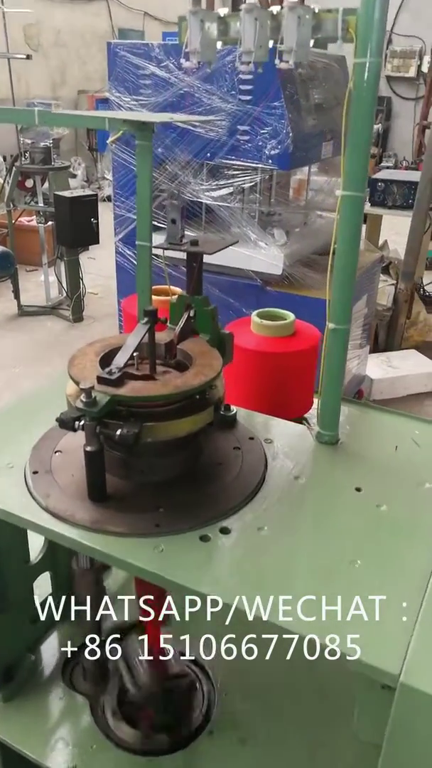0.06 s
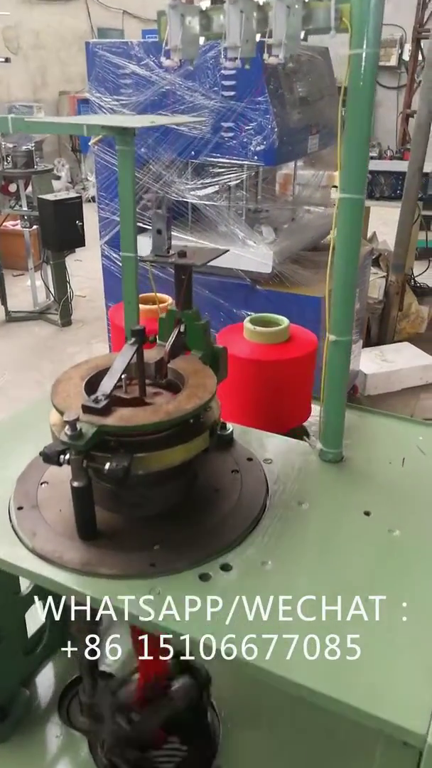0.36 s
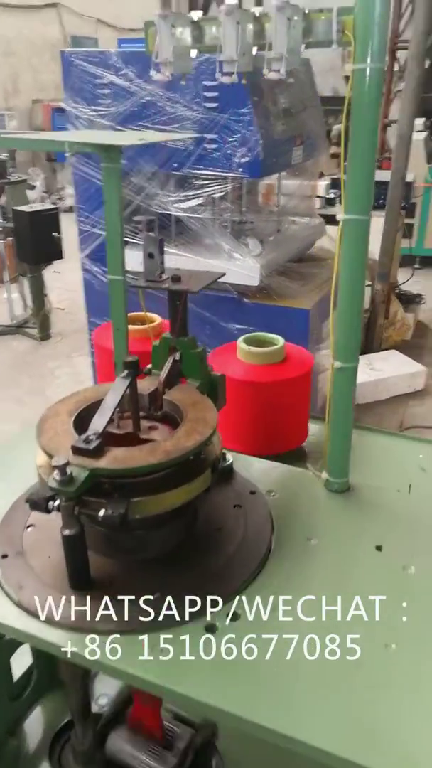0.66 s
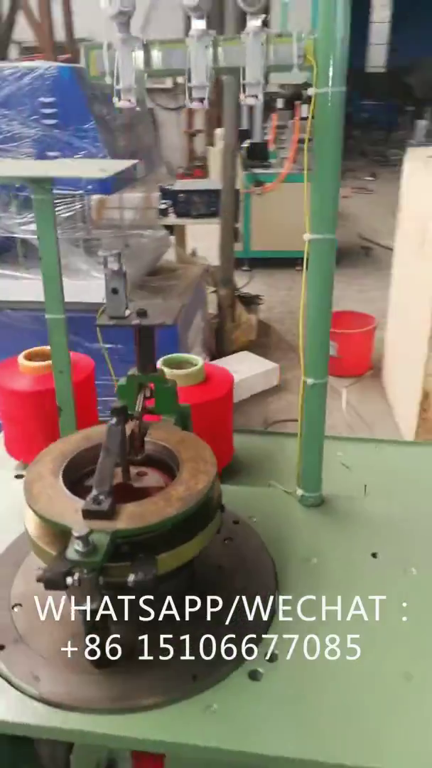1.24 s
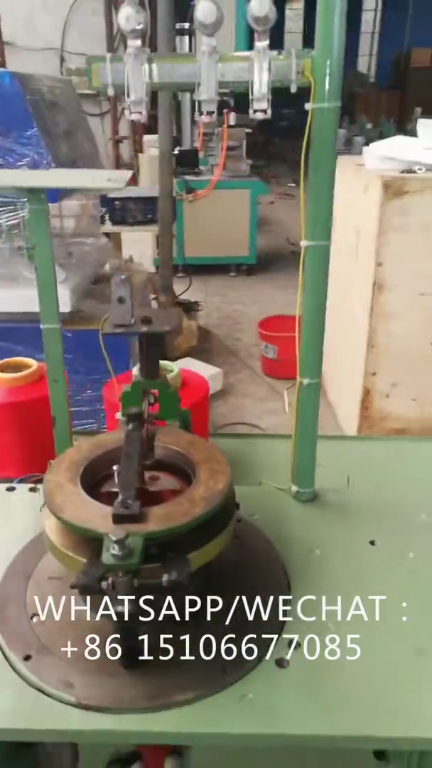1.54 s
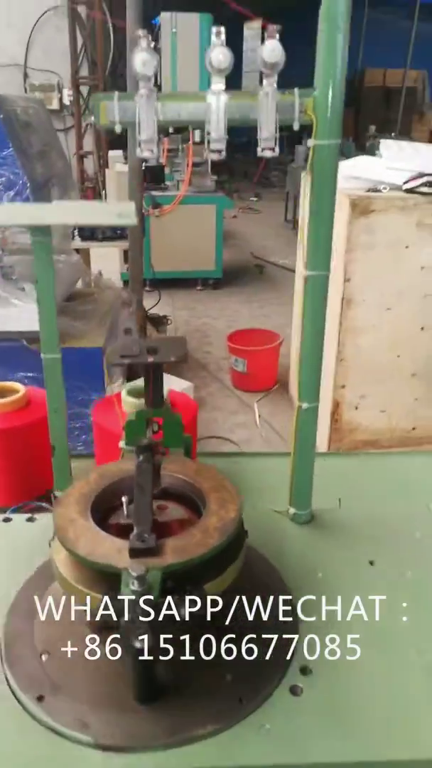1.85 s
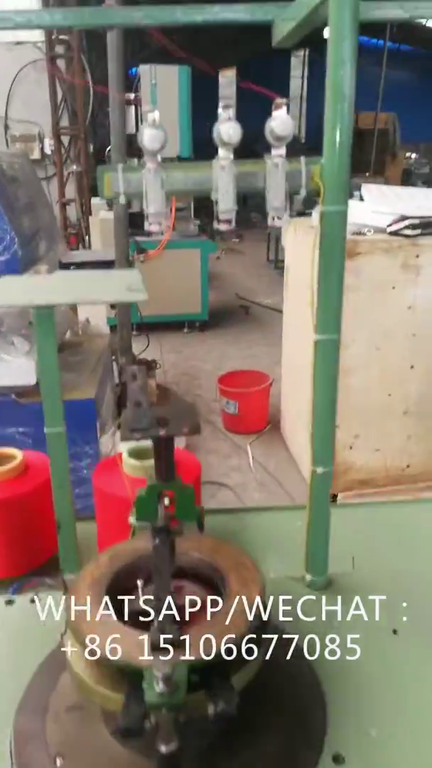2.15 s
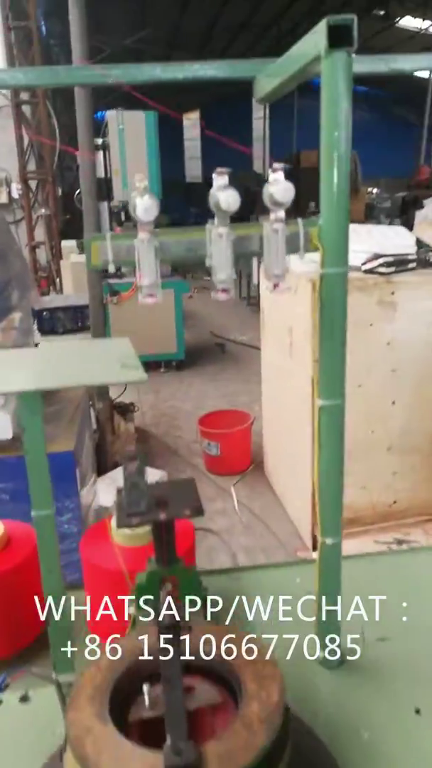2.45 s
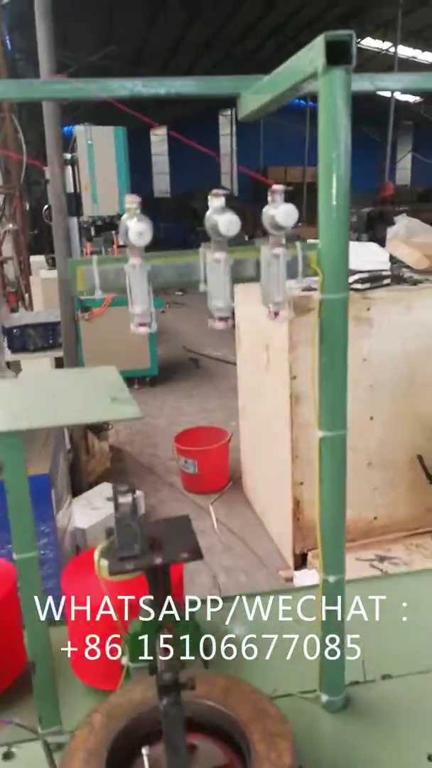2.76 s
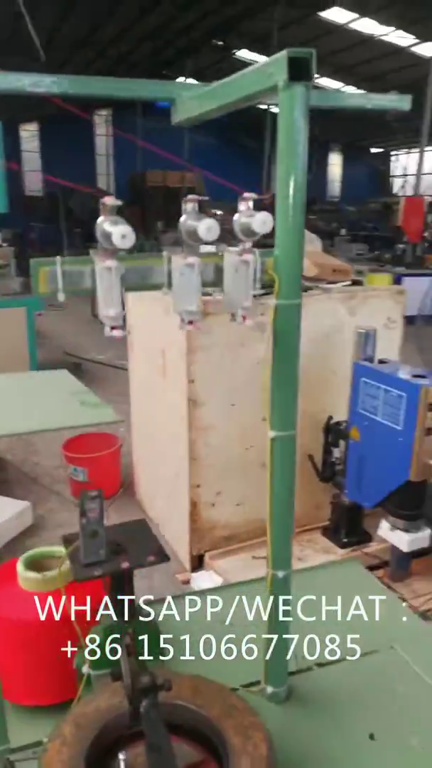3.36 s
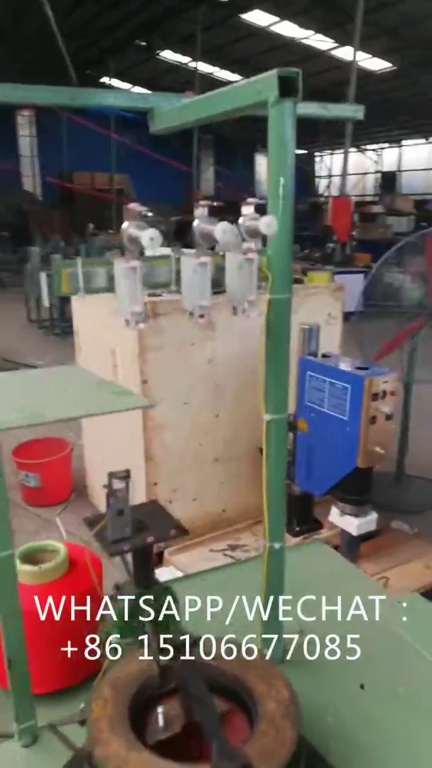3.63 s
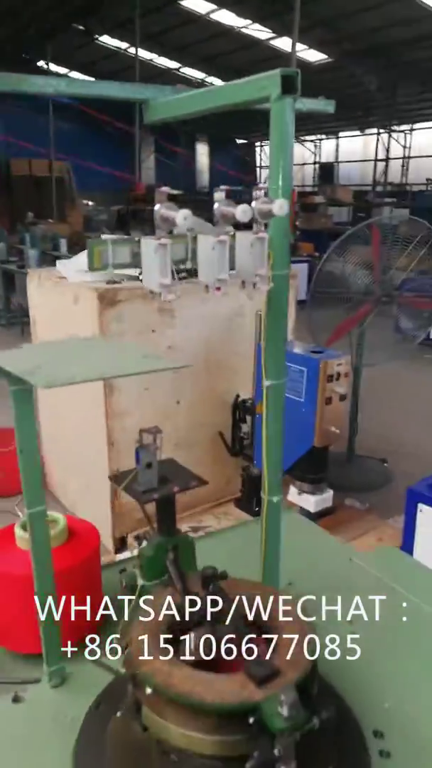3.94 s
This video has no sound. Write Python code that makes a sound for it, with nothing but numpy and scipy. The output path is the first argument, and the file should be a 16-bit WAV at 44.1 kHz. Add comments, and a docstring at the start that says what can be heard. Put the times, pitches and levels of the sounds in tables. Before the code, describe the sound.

A circular knitting machine whirs and hums steadily in a workshop. Each quick turn brings two metallic clacks, soft thumps and a few faint ticks. The whir grates briefly early on, then grows a little brighter as the nearby microphone moves.

```python
"""A small circular knitting machine runs in a factory hall at about 2.6 turns a second. Needles swish
and rattle through the cams over the hum of the drive. Each turn opens with a brief lull and a pair of
ringing steel clacks; then the frame thumps, the cam box swells and, about half a turn on, come a few
lighter ticks. Early on the whir grates three times, and a brief knock near 2.1 kHz thickens the clack
at 0.83 s. The microphone drifts past: the whir is brightest around 3 s, then shifts back."""
import sys
import numpy as np
from scipy import signal
from scipy.fft import rfft, irfft
from scipy.io import wavfile
from scipy.ndimage import uniform_filter1d

SR = 44100
rng = np.random.default_rng(int(sys.argv[2]) if len(sys.argv) > 2 else 0)


def materialize(psi):
    """Save the field psi as 16-bit PCM at rate SR to the path in sys.argv[1].

    A 1-D psi becomes a single channel; in a 2-D psi each row is a channel.
    """
    bounded = np.clip(np.atleast_2d(psi).T, -1, 1)
    quanta = np.round(bounded * 32767).astype(np.int16)
    wavfile.write(sys.argv[1], SR, quanta)


N = 176400
TIME_S = np.arange(N) / SR


def amp(db):
    """Decibels to gain."""
    return 10 ** (np.asarray(db) / 20)


def unit(x):
    """Scales to rms 1."""
    return x / np.sqrt(np.mean(x ** 2) + 1e-20)


def bell(offset, sigma):
    """Gaussian of height 1."""
    return np.exp(-(offset / sigma) ** 2 / 2)


def read(table, hz, column=1):
    """Interpolates a column along log frequency."""
    columns = np.transpose(table)
    return np.interp(np.log(hz + 1), np.log(columns[0] + 1), columns[column])


def add(mix, start_s, sound):
    """Mixes a stereo sound in at start_s."""
    part = mix[:, max(round(start_s * SR), 0):][:, :sound.shape[1]]
    part += sound[:, :part.shape[1]]


def colour(x, spectrum, size=2048):
    """Minimum-phase filter of unit energy."""
    log_gain = np.log(amp(read(spectrum, abs(np.fft.fftfreq(size, 1 / SR)))))
    response = np.exp(np.conj(signal.hilbert(log_gain)))
    taps = np.fft.ifft(response).real[:size // 2]
    return signal.oaconvolve(x, taps[None] / np.linalg.norm(taps), axes=1)[:, :N]


def pair(a, b, correlation):
    """Correlated stereo from two independent signals."""
    correlation = np.clip(correlation, -1, 1)
    mid, side = np.sqrt((1 + correlation) / 2) * a, np.sqrt((1 - correlation) / 2) * b
    return np.array([mid + side, mid - side])


# Stereo field. Each row: frequency in Hz, left-right correlation, left over right in dB.
STEREO = [(60, 1, -7), (172, 1, 3), (330, 0.48, -4.5), (650, -0.93, -1), (750, 0.17, -0.9),
          (1440, 0.41, -2), (2020, 0.12, -1), (2990, -0.37, -3.5), (3550, 0.24, 0), (4800, -0.16, 2),
          (10300, -0.019, -0.5), (15000, 0.059, 3.5)]


def resonance(centre_hz, width_hz):
    """Stereo noise held in one resonance."""
    hz = np.fft.rfftfreq(N, 1 / SR)
    detuning = 2 * (hz - centre_hz) / width_hz
    a, b = irfft(rfft(rng.standard_normal((2, N))) / (1 + detuning ** 2) ** 2, N)
    return pair(unit(a), unit(b), read(STEREO, centre_hz))


def tone(hz, offset_rad):
    """Sine of rms 1, reaching the left channel a little late."""
    phase = 2 * np.pi * hz * TIME_S + offset_rad
    lag_rad = np.arccos(np.clip(read(STEREO, hz), -1, 1))
    return np.sqrt(2) * np.sin([phase - lag_rad, phase])


# Microphone drift. Each row: time in seconds, share of the move made, whir level in dB,
# left over right above the bass in dB.
MIC_PATH = [(0, 0.31, -29, 4.5), (.7, 0.43, -29, 4), (1.3, 0.26, -28.5, 5), (2, 0.42, -28, 3.5),
            (2.7, 0.98, -28, 1), (3.4, 0.96, -28, 1.3), (4, 0.3, -28, 0.5)]
# Whir of cylinder and drive. Each row: frequency in Hz, relative density in dB.
WHIR_SPECTRUM = [(50, -46), (100, -17), (215, -17.5), (300, -6), (430, -11), (660, -7.5), (880, -9.5),
                 (1500, -5), (2200, -7.5), (2800, -14), (3600, -12.5), (5200, -17), (8000, -20),
                 (10000, -24), (10700, -28.5), (13000, -27), (14300, -24.5), (15800, -32)]
# Colour change over the full move. Each row: frequency in Hz, gain in dB.
MOVE_COLOUR = [(50, 4), (130, -0.5), (300, 0), (600, 0), (1100, -1.5), (2000, -0.5), (3800, 3), (7000, 2),
               (14000, 5)]
# Steely peaks that slide with the move. Each row: from and to in Hz, sigma in Hz, boost in dB.
WHIR_PEAKS = [(1150, 1120, 150, 5.5), (1920, 1640, 78, 5), (4820, 4380, 140, 4.5)]


def whir(patch_db=1.56, flutter_db=0.57, ripple_db=2.5, bass_edge_hz=780, size=1024):
    """Needles and yarn slide round the cylinder: a fluttering rush with many fine resonances."""
    hop = size // 4
    frames, hz = N // hop + 5, np.fft.rfftfreq(size, 1 / SR)
    t = np.arange(frames) * hop / SR
    a, b, c, d, patches, ripple = rng.standard_normal((6, frames, len(hz)))
    patches = uniform_filter1d(patches, size=7, axis=0)
    patches = unit(uniform_filter1d(patches, size=9, axis=1))
    ripple = unit(uniform_filter1d(ripple, size=150, axis=0))
    flutter = unit(uniform_filter1d(rng.standard_normal((frames, 1)), size=3, axis=0))
    path_s, *controls = np.transpose(MIC_PATH)
    moved, level_db, pan_db = (np.interp(t, path_s, v)[:, None] for v in controls)
    field_db = read(WHIR_SPECTRUM, hz) + moved * read(MOVE_COLOUR, hz)
    field_db += patch_db * patches + ripple_db * ripple + flutter_db * flutter
    for from_hz, to_hz, sigma_hz, db in WHIR_PEAKS:
        field_db += db * bell(hz - from_hz - moved * (to_hz - from_hz), sigma_hz)
    pan_db = pan_db * np.minimum(hz / bass_edge_hz, 1) + read(STEREO, hz, column=2)
    noise = pair(a + 1j * b, c + 1j * d, read(STEREO, hz))
    spectra = noise * amp([field_db + pan_db / 2, field_db - pan_db / 2])
    rush = signal.istft(spectra.swapaxes(1, 2), nperseg=size, noverlap=size - hop)[1][:, :N]
    return unit(rush) * amp(np.interp(TIME_S, t, level_db[:, 0]))


# Needle rattle in the cam box. Each row: frequency in Hz, relative density in dB.
RATTLE_SPECTRUM = [(300, -25.5), (800, -5.5), (1130, 0.5), (1480, -1), (1760, 0.5), (2600, -10),
                   (4400, -11.5), (15000, -31)]


def rattle(level_db=-35.5, taps_per_s=500, spread_db=3.5, correlation=0.35):
    """Needle butts tap the cams at random, a few of them harder."""
    struck = rng.random(N) < taps_per_s / SR
    force = amp(spread_db * np.minimum(rng.exponential(1, N), 3.5))
    taps = struck * force * rng.choice([-1., 1.], (2, N))
    return amp(level_db) * unit(colour(pair(*taps, correlation), RATTLE_SPECTRUM))


# Drive hum and thin whines. Each row: frequency in Hz, level in dB, linewidth in Hz,
# drift in dB per second as the microphone moves.
DRIVE_TONES = [(60, -65, 1, 1.2), (141, -57.5, 8, 1), (252, -49.5, 5, 1), (306, -53.5, 7, 0),
               (397, -54.5, 4, 1), (462, -52.5, 4, 0), (564, -48.5, 4, -2), (1152, -47.5, 9, 2),
               (1270, -42.5, 5, -1.8), (1701, -47, 10, 1.8), (1781, -48.5, 10, -3), (1910, -50, 8, -2.5),
               (4376, -53.5, 2, .5), (5152, -58.5, 1, 0), (5270, -57.5, 1, 0), (9958, -65.5, 4, 0)]


def hum(waver_db=3, points=800):
    """Tones of motor, belt and gears wander in phase and waver in level."""
    t, total = np.linspace(0, N / SR, points), np.zeros((2, N))
    for hz, db, width_hz, db_per_s in DRIVE_TONES:
        wander_rad = np.cumsum(rng.standard_normal(points)) * np.sqrt(2 * np.pi * abs(width_hz) * t[1])
        waver = unit(uniform_filter1d(rng.standard_normal(points), size=14))
        gain = amp(db + db_per_s * (t - t.mean()) + waver_db * waver)
        total += np.interp(TIME_S, t, gain) * tone(hz, np.interp(TIME_S, t, wander_rad))
    return total


def lull(depth_db=-1.5, half_s=0.017):
    """Gain that eases off just before each pair of clacks."""
    dips = sum(np.exp(-((TIME_S - start_s + half_s) / half_s) ** 2) for start_s in turn_starts_s())
    return amp(depth_db * dips)


def scrape(fall_s, hold_s=0.0032, rise_s=0.0019):
    """A few milliseconds of steel chattering on steel."""
    t = np.arange(SR // 10) / SR
    envelope = np.minimum(t / rise_s, 1) * np.exp(-np.maximum(t - hold_s, 0) / fall_s)
    return rng.standard_normal((2, len(t))) * envelope


# Steel clacks, two a turn. Each row: start in seconds, strike and ring in relative dB.
CLACKS = [(0.0192, -16.5, -29.5), (0.0583, -17.5, -29), (0.4019, -14.5, -29), (0.4426, -22, -29.5),
          (0.7853, -21, -34), (0.8297, -21.5, -30), (1.172, -20.5, -29), (1.215, -25, -30),
          (1.5534, -21, -32.5), (1.599, -25, -31), (1.9373, -17.5, -29), (1.982, -26, -29.5),
          (2.319, -19.5, -33.5), (2.363, -24, -30.5), (2.6975, -20, -34), (2.7414, -24.5, -33),
          (3.0803, -21, -46), (3.118, -21, -31), (3.4576, -25, -40), (3.4998, -19, -28.5),
          (3.8393, -20, -37), (3.877, -22.5, -35)]
# Colour of a clack. Each row: frequency in Hz, relative density in dB.
CLACK_SPECTRUM = [(200, -39), (1200, -7), (2200, 8), (4000, 3.5), (6000, 7), (7800, 1), (10500, -4.5),
                  (15000, -6.5)]


def clacks(gain_db=-6):
    """Steel strikes steel twice as each turn opens."""
    strikes = np.zeros((2, N))
    for start_s, db, _ in CLACKS:
        add(strikes, start_s, amp(db + gain_db) * scrape(fall_s=0.0051))
    return colour(strikes, CLACK_SPECTRUM)


# Ringing steel parts. Each row: centre in Hz, width in Hz, relative level in dB, T60 in seconds,
# drift in dB per second as the microphone moves.
STEEL_BANDS = [(2500, 900, 1.5, 0.072, 5.5), (3302, 830, 4.5, 0.13, -1.3), (7780, 310, -4.5, 0.045, -5.5)]


def ring(gain_db=-3.5, rise_s=0.0068):
    """Each clack sets clusters of close steel modes ringing."""
    t, blows, total = np.arange(SR // 4) / SR, np.zeros(N), np.zeros((2, N))
    for start_s, _, ring_db in CLACKS:
        blows[round(start_s * SR)] = amp(ring_db + gain_db)
    for hz, width_hz, db, t60_s, db_per_s in STEEL_BANDS:
        envelope = np.minimum(t / rise_s, 1) * amp(db - 60 * t / t60_s)
        drift = amp(db_per_s * (TIME_S - N / SR / 2))
        total += resonance(hz, width_hz) * drift * signal.oaconvolve(blows, envelope)[:N]
    return total


def hall(x, gain_db=-5.5, t60_s=0.24, gap_s=0.003):
    """Diffuse reflections from the table and the hall around it."""
    t = np.arange(SR // 2) / SR
    tail = rng.standard_normal((2, len(t))) * amp(-60 * t / t60_s) * (t > gap_s)
    return amp(gain_db) * signal.fftconvolve(x, tail / np.linalg.norm(tail[0]), axes=1)[:, :N]


def turn_starts_s():
    """Time of the first clack of each pair."""
    return np.array(CLACKS)[::2, 0]


def turn_pulse(delay_s, sigma_s):
    """Smooth pulse delay_s into every turn."""
    starts_s = turn_starts_s()
    turn = np.maximum(np.searchsorted(starts_s, TIME_S) - 1, 0)
    return bell(TIME_S - starts_s[turn] - delay_s, sigma_s)


# Frame thumps. Each row: delay into the turn in seconds, level in dB.
FRAME_THUMPS = [(0.12, -44), (0.335, -38.5)]


def thumps(hz=314.4, sigma_s=0.014):
    """The frame thumps softly as the load rises, twice a turn."""
    load = sum(amp(db) * turn_pulse(delay_s, sigma_s) for delay_s, db in FRAME_THUMPS)
    return load * tone(hz, 2 * np.pi * rng.random())


# Cam box swells. Each row: delay into the turn in seconds, centre in Hz, width in Hz, level in dB.
CAM_SURGES = [(0.216, 1054, 170, -33), (0.318, 1090, 300, -33.5), (0.187, 4490, 760, -39)]


def surges(sigma_s=0.012):
    """The cam box swells as the load rises at set angles of each turn."""
    return sum(amp(db) * resonance(hz, width_hz) * turn_pulse(delay_s, sigma_s)
               for delay_s, hz, width_hz, db in CAM_SURGES)


# Light ticks. Each row: start in seconds, relative level in dB.
TICKS = [(0.2396, -26), (0.2815, -27), (0.6209, -23), (0.6626, -23), (0.7053, -27.5), (0.999, -24.5),
         (1.042, -27), (1.38, -27), (1.4206, -26), (1.4964, -30), (1.762, -30), (1.8006, -26.5),
         (2.1411, -26), (2.184, -24.5), (2.233, -29), (2.5266, -29.5), (2.5675, -27), (2.6148, -32),
         (2.9096, -25), (2.9522, -26.5), (3.3377, -27), (3.7614, -32)]
# Colour of a tick. Each row: frequency in Hz, relative density in dB.
TICK_SPECTRUM = [(200, -38), (1200, -1), (4400, -2), (6600, 4.5), (7600, 7.5), (8500, 3), (10500, -3),
                 (15000, -7)]


def ticks(gain_db=-1.5):
    """Shorter steel contacts, about half a turn after the clacks."""
    strikes = np.zeros((2, N))
    for start_s, db in TICKS:
        add(strikes, start_s, amp(db + gain_db) * scrape(fall_s=0.0031))
    return colour(strikes, TICK_SPECTRUM)


# Three grates, then a knock. Each row: peak time in seconds, centre in Hz, width in Hz, level in dB.
GRATES_AND_KNOCK = [(.275, 1970, 260, -32), (.478, 1800, 120, -32), (.58, 1800, 120, -34),
                    (.822, 2150, 600, -31)]


def grates_and_knock(sigma_s=0.017):
    """Brief noise bands: the whir grates three times, then a knock thickens a clack."""
    return sum(amp(db) * resonance(hz, width_hz) * bell(TIME_S - peak_s, sigma_s)
               for peak_s, hz, width_hz, db in GRATES_AND_KNOCK)


def scene(hits_left_db=1):
    """The running machine; clacks and ticks echo and sit slightly left."""
    running = (whir() + rattle()) * lull() + hum() + surges() + thumps() + grates_and_knock()
    hits = clacks() + ticks() + ring()
    balance = amp([[hits_left_db / 2], [-hits_left_db / 2]])
    return running + (hits + hall(hits)) * balance


def record(dry, edge_hz=15980):
    """Steep low-pass on the top treble."""
    taps = signal.firwin(511, edge_hz, window=("kaiser", 9), fs=SR)
    return signal.oaconvolve(dry, taps[None], "same")


dry = scene()
out = record(dry)
materialize(out)
```